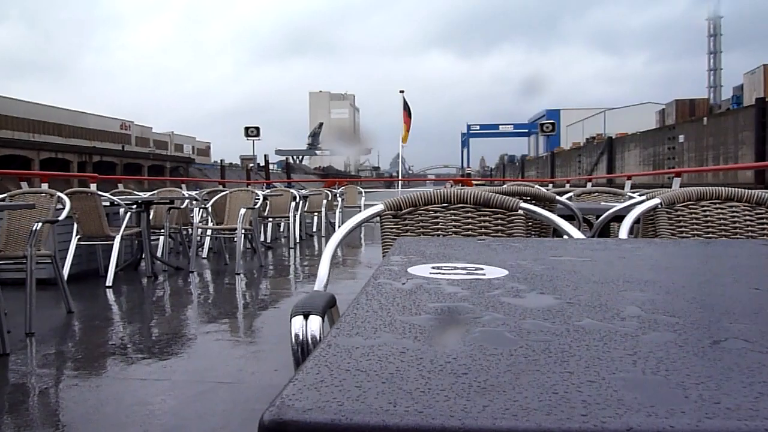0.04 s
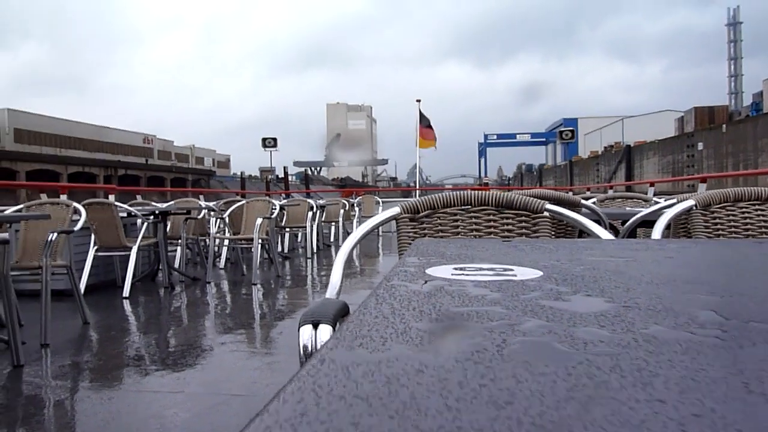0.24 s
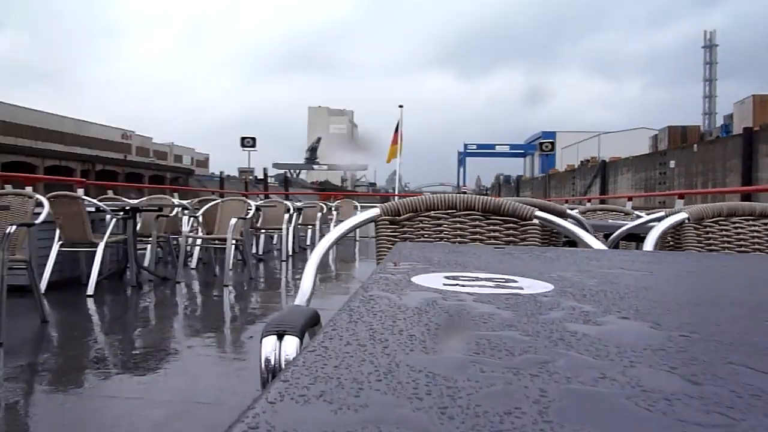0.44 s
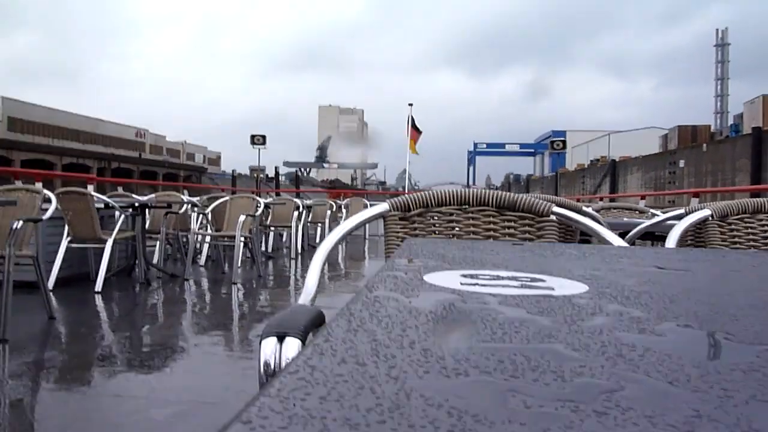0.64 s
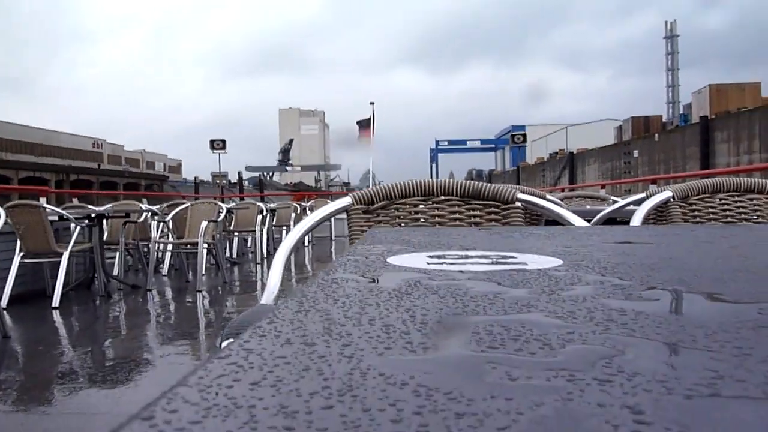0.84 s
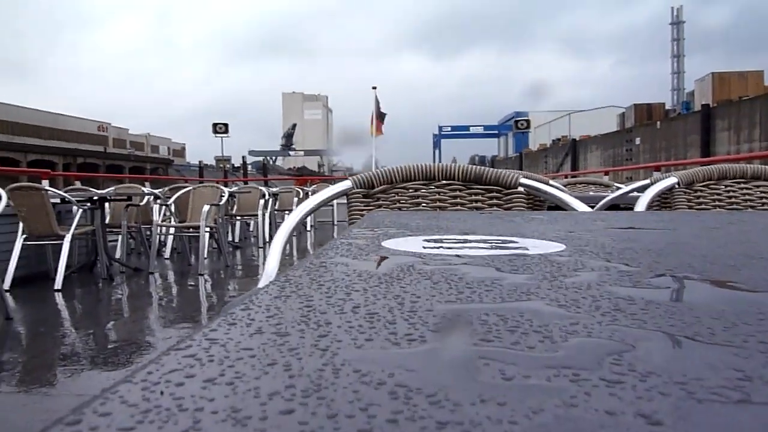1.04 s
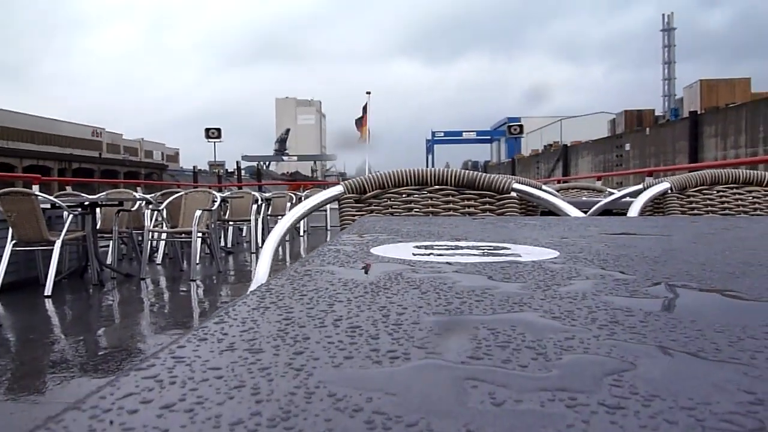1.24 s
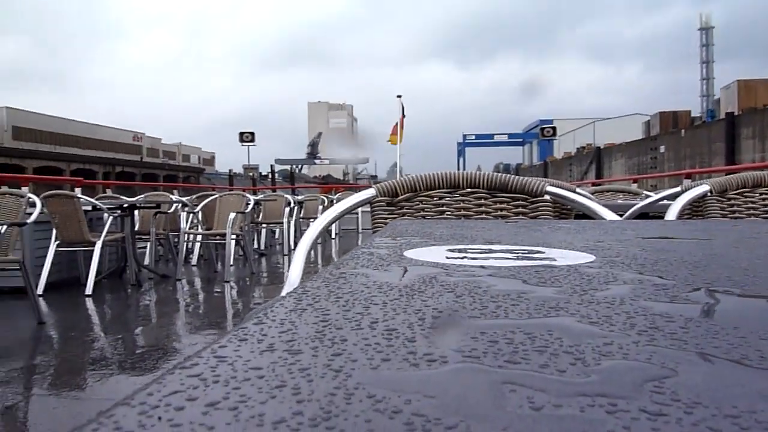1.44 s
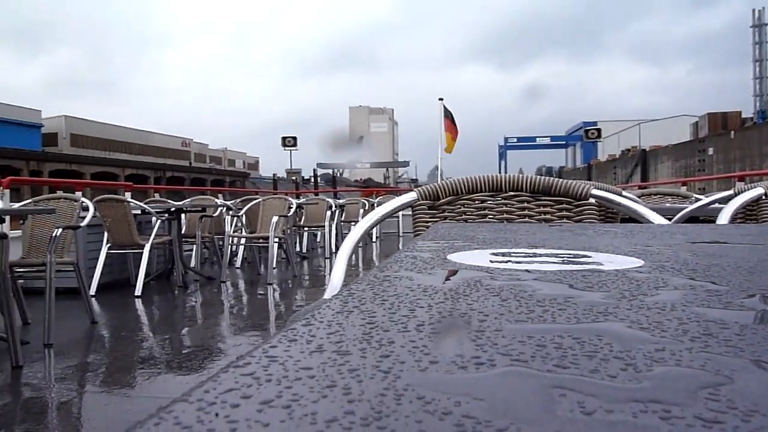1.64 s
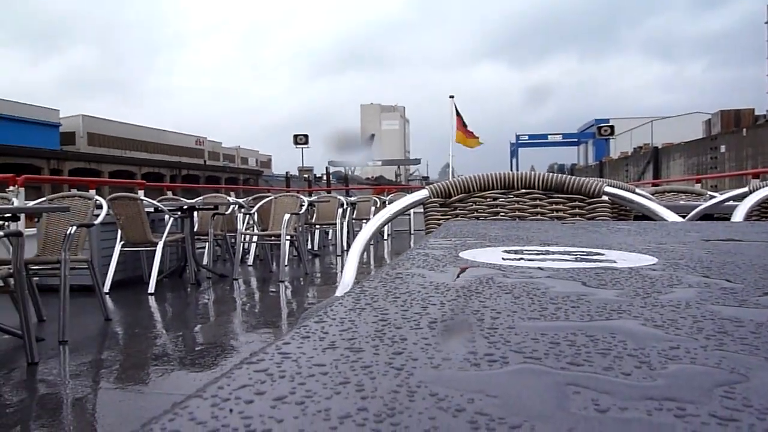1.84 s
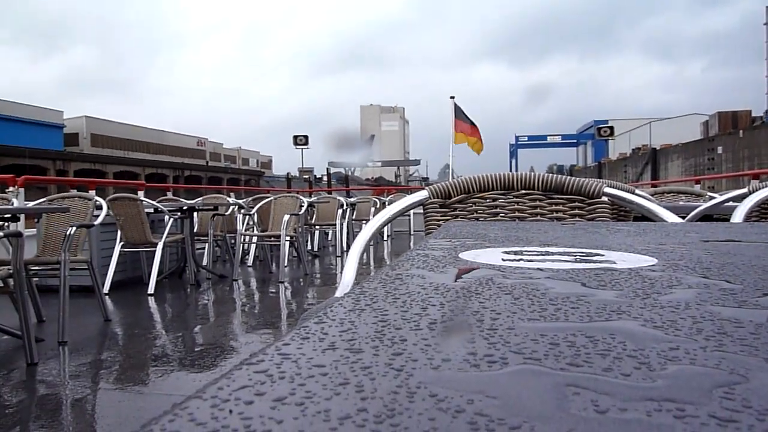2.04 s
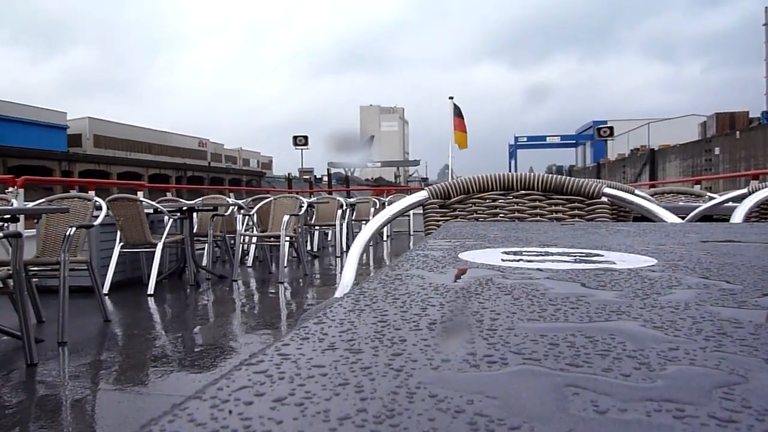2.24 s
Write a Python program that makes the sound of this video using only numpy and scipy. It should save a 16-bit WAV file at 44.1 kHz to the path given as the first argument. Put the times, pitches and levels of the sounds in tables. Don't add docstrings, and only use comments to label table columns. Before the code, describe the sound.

Steady low boat engine drone with hissing wake, a splash of spray, droplet ticks and wind buffeting.

```python
import sys
import numpy as np
from scipy import signal
from scipy.fft import rfft, irfft, next_fast_len
from scipy.io import wavfile
from scipy.ndimage import uniform_filter1d, map_coordinates

SR = 44100
rng = np.random.default_rng(int(sys.argv[2]) if len(sys.argv) > 2 else 0)


def wrap_up_sound(samples):
    columns = np.atleast_2d(samples).T
    tamed = np.clip(columns, -1, 1)
    steps = np.round(tamed * 32767).astype(np.int16)
    wavfile.write(sys.argv[1], SR, steps)


def level_to_linear(level):
    exponent = np.asarray(level, float) / 20
    return 10 ** exponent


N = 100592

# pitch_hz, likeness (0 to 1)
ALIKE = [(60, 0.6), (200, 1), (700, 0.99), (1500, 0.79), (3000, .4), (6000, 0.16)]
# time_s, level_db
SPRAY = [
    (.22, -37),
    (.32, -38),
    (.345, -32),
    (.44, -35),
    (.49, -30.5),
    (.56, -31),
    (.62, -35.5),
    (.65, -43),
    (.69, -48.5),
]


def unit(x):
    return x / np.sqrt(np.mean(x ** 2) + 1e-20)


def along(points, hz):
    f, v = np.transpose(points)
    return np.interp(np.log(hz + 1), np.log(f + 1), v)


def curves(rows):
    s, *cols = np.transpose(rows)
    return [np.interp(np.arange(N) / SR, s, c) for c in cols]


def wobble(rate):
    knots = rng.standard_normal(int(N * 60 / SR) + 4)
    return map_coordinates(knots, [np.arange(N) * rate / SR])


def filtered(x, response):
    m = next_fast_len(N + SR // 2)
    return irfft(rfft(x, m) * response(np.fft.rfftfreq(m, 1 / SR)), m)[..., :N]


def rush(tone, alike, patchy_db):
    z = signal.stft(rng.standard_normal((2, N)), nperseg=512)[2]
    field = uniform_filter1d(rng.standard_normal(z.shape[1:]), size=6, axis=0)
    field = uniform_filter1d(field, size=10, axis=1)
    pair = signal.istft(z * level_to_linear(patchy_db * unit(field)), nperseg=512)[1][:, :N]

    def mid_side(hz):
        angle = np.arccos(np.clip(along(alike, hz), -1, 1)) / 2
        return level_to_linear(tone(hz)) * [np.cos(angle), np.sin(angle)]

    mid, side = filtered(pair, mid_side)
    return unit(np.array([mid + side, mid - side]))


def pan(db):
    return level_to_linear(np.array([[db / 2], [-db / 2]]))


def engine():
    # multiple of the firing rate, level_db over the roar's reference
    orders = [
        (1, 4),
        (2, -0.5),
    ]
    # pitch_hz, width_hz, boost_db
    hull = [(350.8, 5.1, 9), (422, 47, 3), (469, 14, 4), (588, 19.6, 4.5), (933, 41, -5), (1950, 50, 4)]
    # pitch_hz, level_db (per Hz)
    roar_tone = [(15, -47), (25, -17), (64, -13.5), (178, -7), (226, -4.5), (277, -8.5), (421, -10),
                 (977, -18), (3000, -42.5), (3900, -60), (6600, -120)]
    firing_hz, gear_hz, drift = 78.48, 226.6, .002
    gear_db, gear_sway_db, fire_sway_db = 9.5, .9, 1.8
    roar_db, chug_depth = 11, .08
    lead_rad = 0.084

    turn = 2 * np.pi * np.cumsum(1 + drift * wobble(3.22)) / SR
    lead = np.array([[lead_rad / 2], [-lead_rad / 2]])
    tones = 0
    for k, db in orders:
        tones = tones + level_to_linear(db + fire_sway_db * wobble(8.23)) * np.sin(k * firing_hz * turn + lead)
    tones = tones + level_to_linear(gear_db + gear_sway_db * wobble(6)) * np.sin(gear_hz * turn + lead)

    def colour(f):
        ringing = sum(db / (1 + (2 * (f - hz) / w) ** 2) for hz, w, db in hull)
        return along(roar_tone, f) + ringing

    chug = 1 + chug_depth * np.cos(firing_hz * turn)
    roar = rush(colour, ALIKE, patchy_db=.6) * chug * level_to_linear(.8 * wobble(14))
    return np.sqrt(2) * tones * pan(-1.6) + level_to_linear(roar_db) * roar


def wake():
    # pitch_hz, level_db (per Hz)
    hiss_tone = [(880, -29), (1500, -6.5), (1900, -3), (3280, -10.5), (8470, -17), (14900, -27.5),
                 (15900, -25)]
    level_db = -2 + 0.3 * wobble(11.77)
    return level_to_linear(level_db) * rush(lambda f: along(hiss_tone, f), ALIKE, patchy_db=-1.04)


def spray():
    # pitch_hz, level_db (per Hz)
    spray_tone = [(400, -63), (900, 4.5), (1500, -9.5), (2800, -7.5), (5000, -6), (8000, -8.5),
                  (15900, -17.5)]
    end_s = 0.054
    level_db, = curves(SPRAY)
    fade_db = -60 * np.maximum(np.arange(N) / SR - SPRAY[-1][0], 0) / end_s
    grains = rush(lambda f: along(spray_tone, f), ALIKE, patchy_db=3.0)
    sheet = unit(level_to_linear(0.31 * wobble(55.3)) * grains)
    return level_to_linear(level_db - 1 + fade_db) * sheet * pan(3)


def ticks():
    # start_s, peak_db, ring_hz, width_hz, decay_s (time to fall 60 dB)
    drops = [(0.336, -26, 3400, 1500, 0.13), (.481, -17.5, 4500, 9000, 0.033),
             (0.487, -16.5, 10000, 9000, 0.021), (0.5, -28, 5000, 6000, 0.025),
             (0.521, -18.5, 3680, 2170, .06), (.532, -17.5, 3180, 1500, 0.018),
             (.544, -22, 3830, 1800, 0.025), (0.9807, -21, 2170, 2800, 0.028),
             (.981, -22.5, 7660, 5970, 0.02), (1.014, -22.5, 750, 500, .04), (1.052, -32, 2320, 1770, 0.41),
             (1.077, -21, 2970, 1800, 0.039), (1.09, -25, 2550, 1790, 0.19),
             (1.133, -27, 2880, 2500, 0.081), (1.17, -37.5, 2530, 180, 0.8),
             (1.27, -31.5, 2920, 2500, 0.17), (1.482, -33, 3000, 4000, 0.26),
             (1.625, -31, 3870, 6000, 0.042)]
    spread, tilt_hz = .6, 3000
    wet_pan_db, dry_pan_db = 6, -1
    out, t = np.zeros((2, N + SR)), np.arange(8192) / SR
    f = np.fft.rfftfreq(2 * len(t), 1 / SR)
    for s, db, hz, wide_hz, t60 in drops:
        noise = rng.standard_normal(len(t)) + spread * rng.standard_normal((2, len(t)))
        burst = noise * level_to_linear(-60 * t / max(t60, .003))
        resonance = 1j * f * wide_hz / (hz * hz - f * f + 1j * f * wide_hz)
        body = resonance ** 2 / np.sqrt(1 + f / tilt_hz)
        ring = irfft(rfft(burst, 2 * len(t)) * body)[:, :len(t)]
        side = pan(wet_pan_db if s < SPRAY[-1][0] else dry_pan_db)
        out[:, round(s * SR):][:, :len(t)] += level_to_linear(db) * ring / np.abs(ring).max() * side
    return out[:, :N]


def gusts():
    # time_s, strength_db
    strength = [(.22, -54), (.31, -35), (.45, -44), (.57, -32.5), (.655, -20), (.705, -31), (.78, -26.5),
                (.88, -28.5), (.96, -28), (1.04, -28), (1.12, -39), (1.17, -30), (1.23, -36), (1.3, -29),
                (1.45, -48), (1.76, -48), (1.9, -30.5), (2.0, -46)]
    # pitch_hz, level_db (per Hz)
    thump_tone = [(25, -26), (60, 10.5), (100, 13.5), (160, 6), (300, -16), (600, -37), (1500, -90)]
    # pitch_hz, level_db (per Hz)
    slap_tone = [(50, -42), (120, -8), (200, 1.5), (330, -1), (600, -16.5), (1200, -29.5), (3000, -81)]
    strong_db, slap_grows = -30.5, 1.24
    lee_db, lumpy_db = -9, 2.5
    strength_db, = curves(strength)
    lumps = level_to_linear(lumpy_db * np.array([wobble(46.4), wobble(44.7)]))
    apart = [(30, 0.038)]
    thump = rush(lambda f: along(thump_tone, f), apart, patchy_db=1.6)
    slap = rush(lambda f: along(slap_tone, f), apart, patchy_db=1.6)
    slap_db = strong_db + slap_grows * (strength_db - strong_db)
    return lumps * (level_to_linear(strength_db) * thump + level_to_linear(slap_db) * slap) * level_to_linear([[lee_db], [-3]])


def thuds():
    # time_s, peak_db, pitch_hz
    bursts = [(0.621, -10, 200), (.635, -15, 180), (.648, -7.5, 151), (0.665, -14, 195), (0.686, -17, 168),
              (0.736, -12.5, 102), (.755, -13, 203), (0.771, -19.5, 160), (.789, -10, 146),
              (0.809, -14, 140), (.852, -27, 139), (.944, -10, 203), (0.962, -10.5, 123),
              (1.001, -11.5, 164), (1.17, -17, 120), (1.3, -17.5, 130)]
    cycles, leak_db = 0.63, -18.5
    s, db, hz = np.transpose(bursts)[:, :, None]
    u = (np.arange(N) / SR - s) * hz
    phase = rng.uniform(-1.05, 1, (len(bursts), 1))
    push = level_to_linear(db) * np.exp(-(u / cycles) ** 2) * np.cos(2 * np.pi * u + phase)
    return push.sum(0) * level_to_linear([[leak_db], [0]])


def hoot():
    # time_s, pitch_hz, level_db
    pipe = [
        (2.03, 405, -40),
        (2.06, 402, -32),
        (2.085, 408, -30),
        (2.11, 418, -24),
        (2.135, 426, -25.5),
        (2.145, 469, -24.5),
        (2.172, 492, -23.5),
        (2.195, 497, -62),
    ]
    hz, db = curves(pipe)
    t = np.arange(N) / SR
    on = (t > pipe[0][0]) & (t < pipe[-1][0])
    return on * np.sqrt(2) * level_to_linear(db + 1.9 * wobble(55)) * np.sin(2 * np.pi * np.cumsum(hz) / SR)


def air():
    # pitch_hz, level_db (per Hz)
    air_tone = [(1500, -30), (4000, 3), (9000, -3), (16000, -4)]
    return level_to_linear(-52) * rush(lambda f: along(air_tone, f), [(30, .05)], patchy_db=.4)


def scene():
    # time_s, level_db
    gain = [(.22, -35), (.4, -37), (.55, -36), (.62, -36.5), (.67, -43.5), (.8, -44.5), (.9, -39.5),
            (.94, -37.5), (.975, -43.5), (1.02, -41.5), (1.08, -36.5), (1.17, -38.5), (1.25, -41),
            (1.35, -39.5), (1.5, -37.5), (1.7, -36.5), (1.9, -36), (2.05, -37), (2.27, -35.5)]
    lag_s = 3e-5
    gain_db, = curves(gain)
    far = level_to_linear(gain_db) * (engine() + wake()) + hoot()
    far = filtered(far, lambda f: np.exp(np.outer([-1j, 1j], np.pi * f * lag_s)))
    return far + spray() + ticks() + gusts() + thuds() + air()


def top_cut(x):
    return signal.sosfilt(signal.butter(12, 16090, fs=SR, output="sos"), x)


def record(dry):
    start_s, rise_s = 0.2181, 0.00088
    top_hz, edge_hz = 16050, 400
    t = np.arange(N) / SR
    gate = np.clip((t - start_s) / rise_s, 0, 1)
    kept = filtered(dry * gate, lambda f: np.clip((top_hz - f) / edge_hz, 0, 1))
    kept = kept * (t > start_s - .004)
    return top_cut(kept)


dry = scene()
out = record(dry)
wrap_up_sound(out)
```